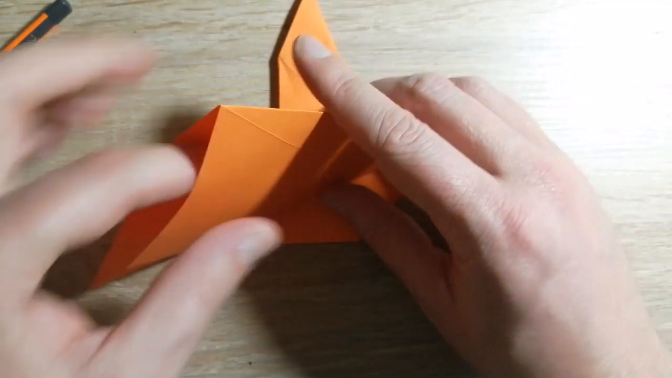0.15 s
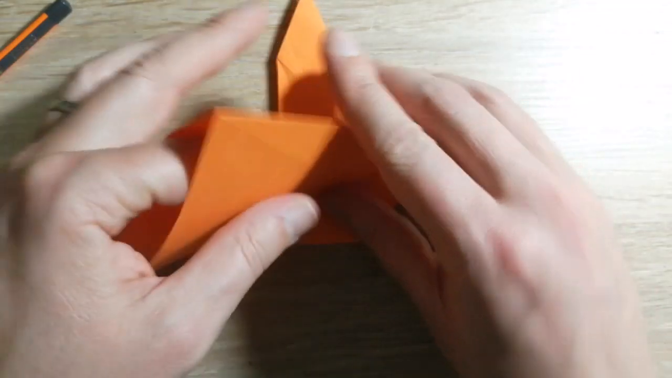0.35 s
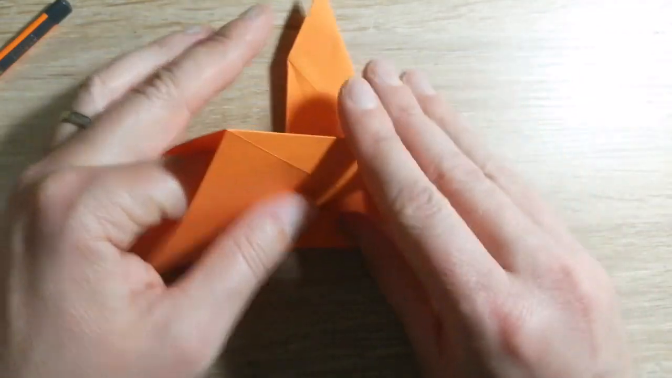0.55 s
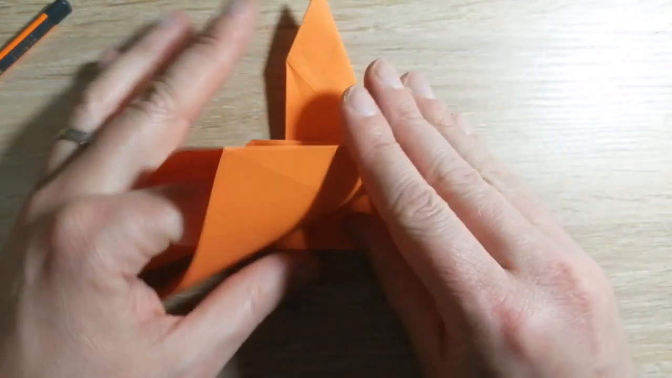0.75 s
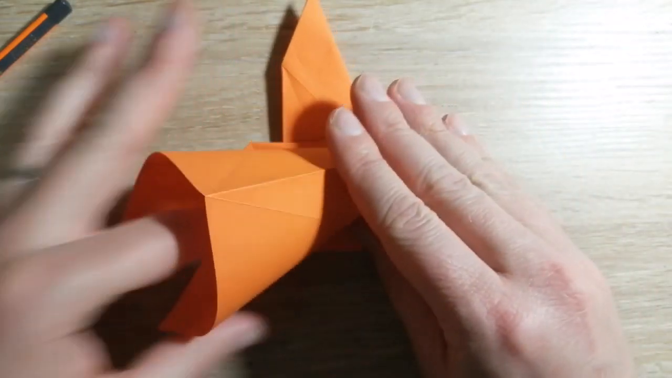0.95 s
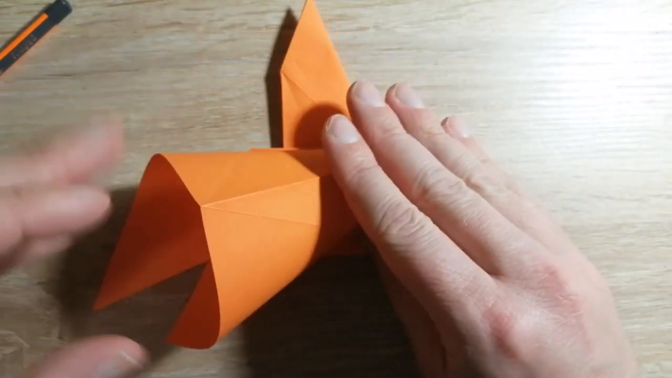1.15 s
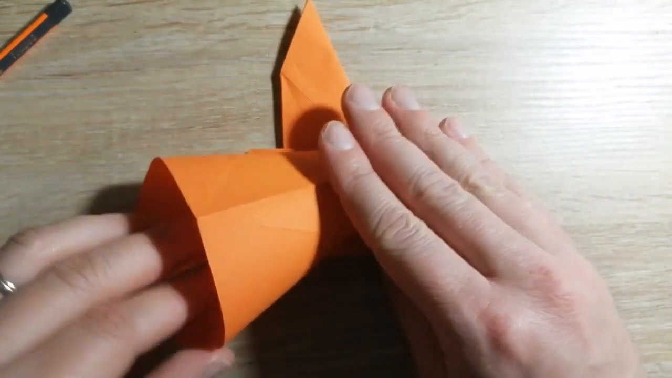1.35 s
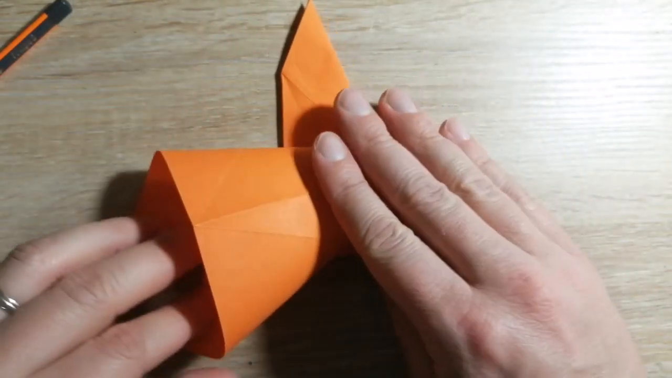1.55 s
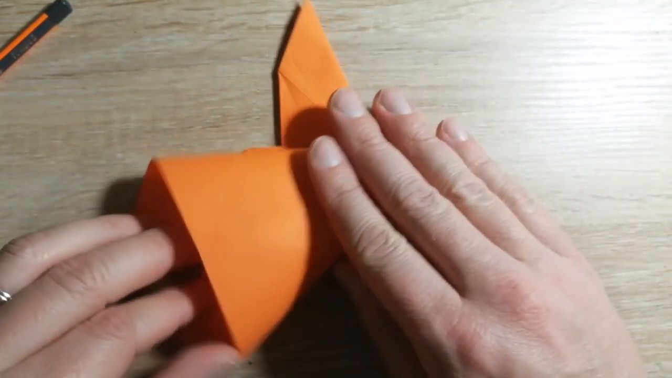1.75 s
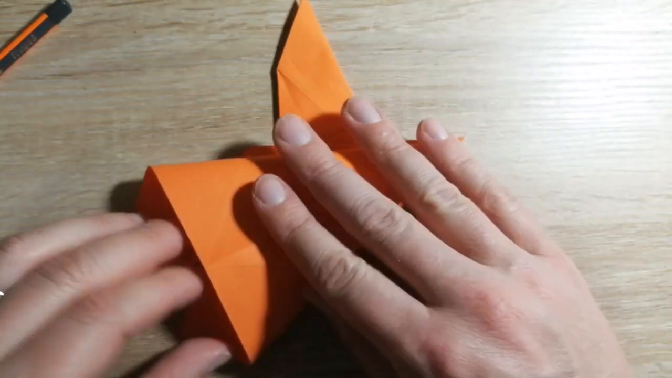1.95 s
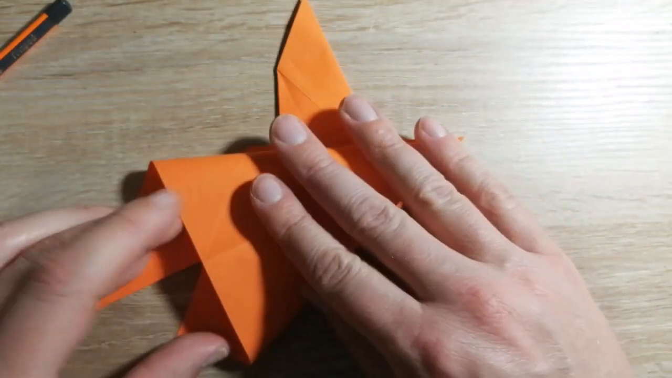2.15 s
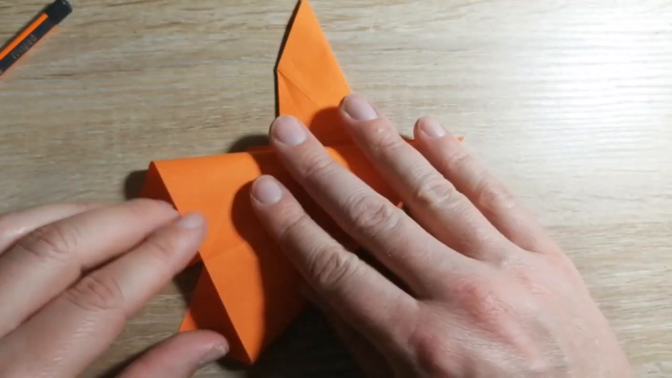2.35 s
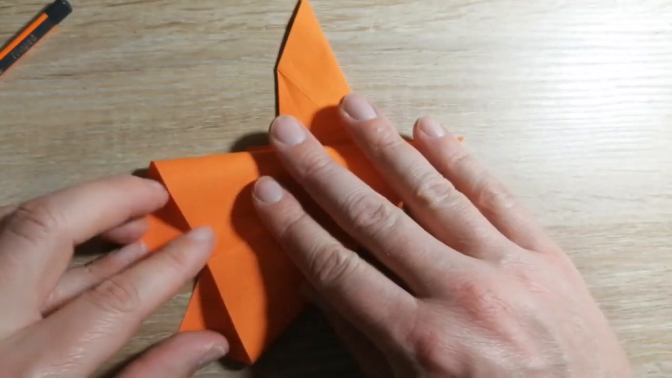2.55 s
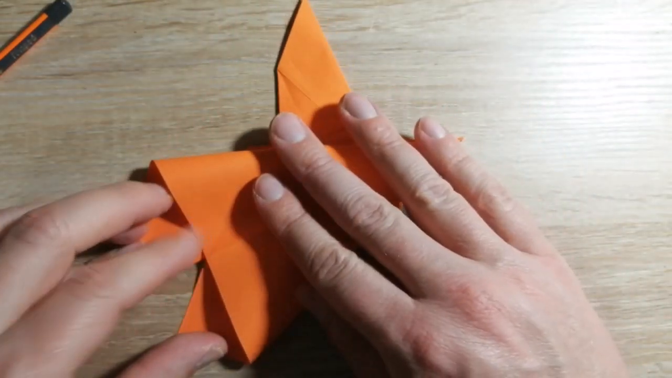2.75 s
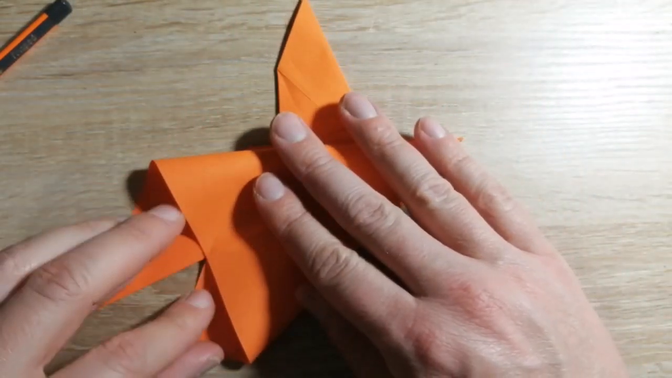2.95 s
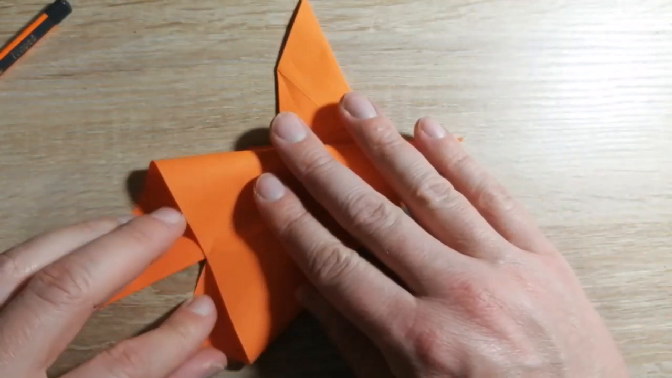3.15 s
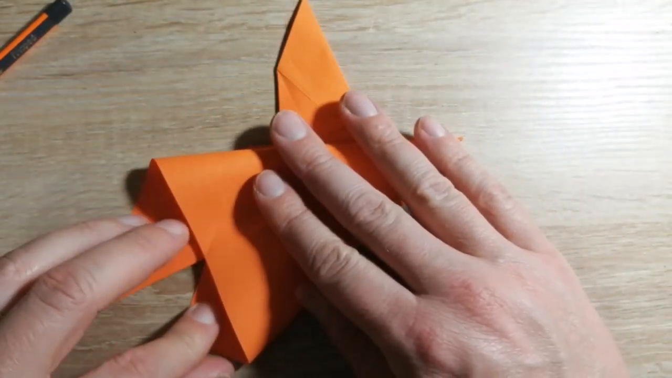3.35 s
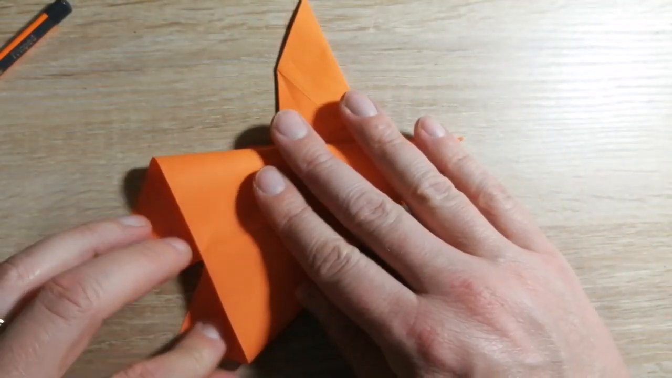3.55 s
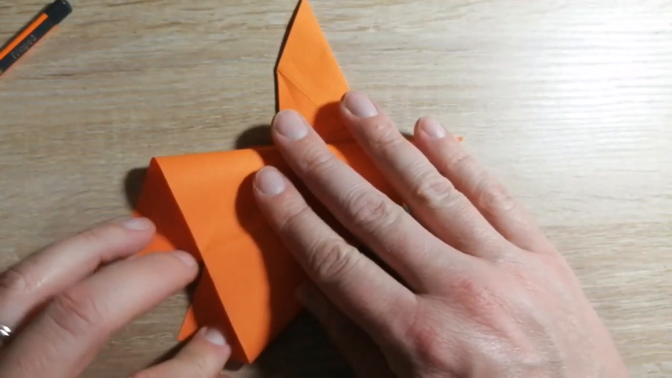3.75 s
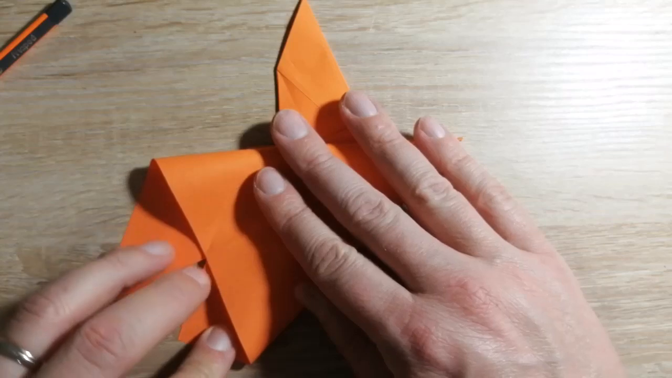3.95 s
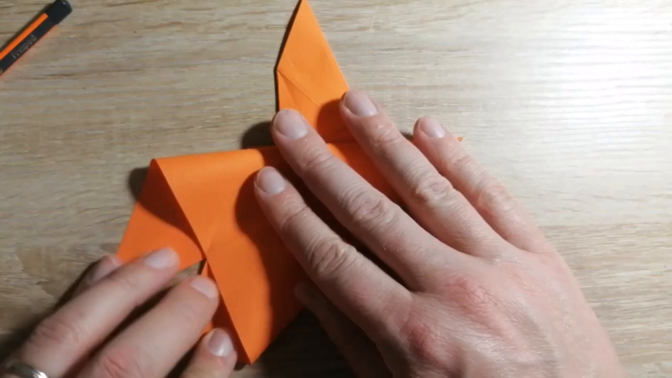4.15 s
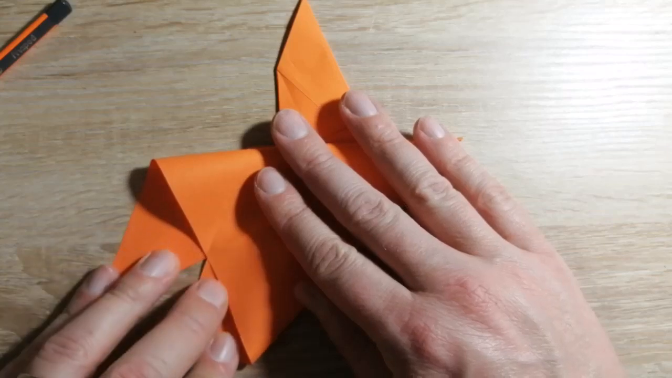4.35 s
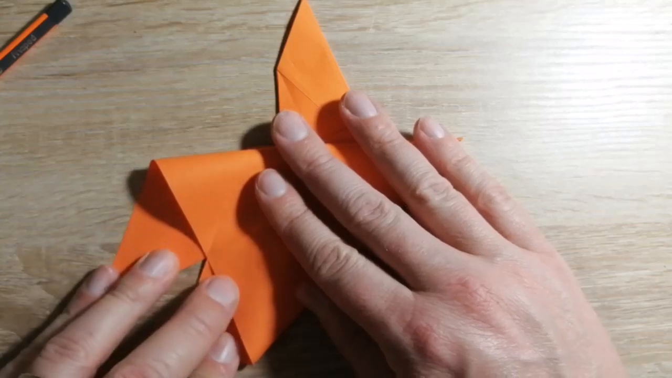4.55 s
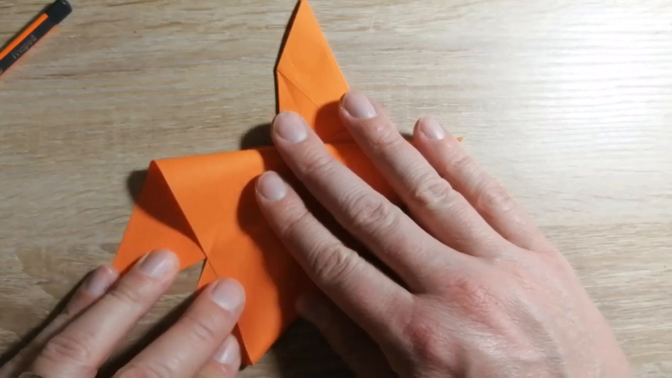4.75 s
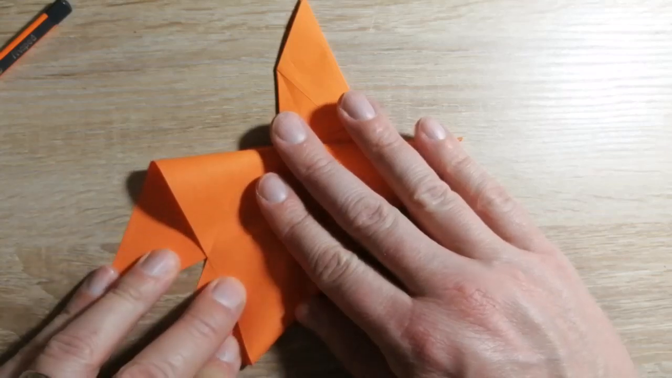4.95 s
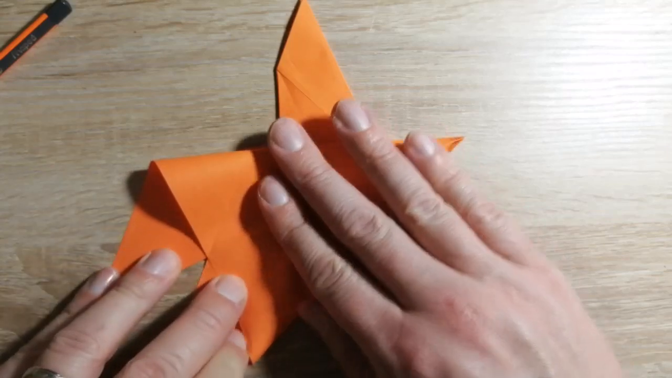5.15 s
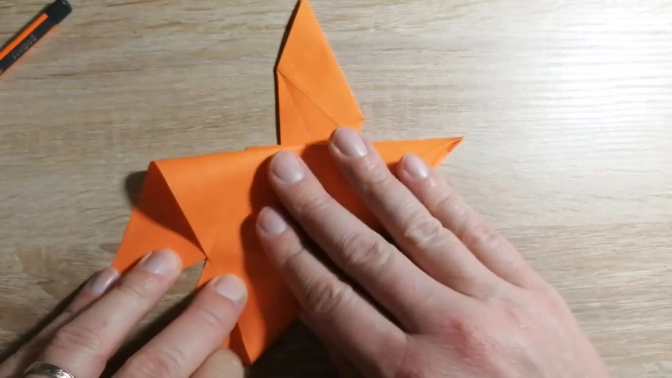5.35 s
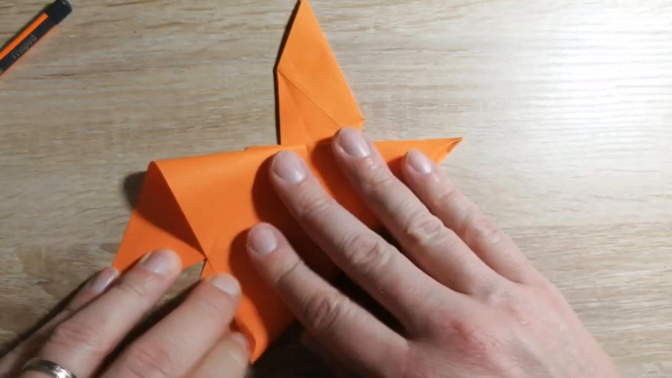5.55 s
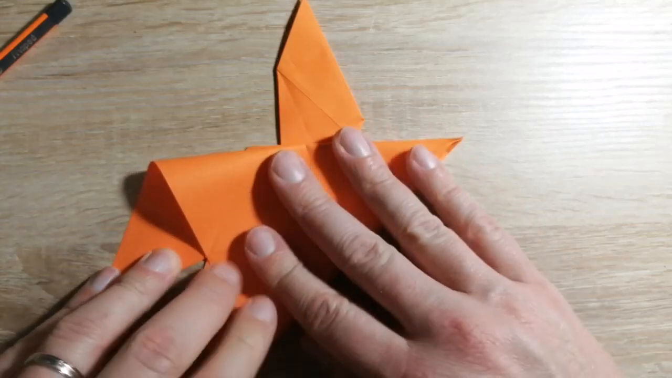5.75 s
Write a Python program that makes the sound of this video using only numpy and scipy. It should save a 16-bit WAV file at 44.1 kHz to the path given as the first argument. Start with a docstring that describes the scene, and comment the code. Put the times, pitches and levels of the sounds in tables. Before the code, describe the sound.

Hands handle folded paper on a table, close to the microphone in a quiet room with little echo. For the first two seconds, skin slides over the sheet in hissing swells while the paper flexes with a slightly hollow rustle. Creases snap crisply at about 0.4 seconds, in a cluster from 1.1 to 1.4, and most sharply near 1.9, with a few soft table bumps underneath. From 2 to 3.6 seconds it is much quieter: small, dull creaking ticks and light finger scuffs, the ticks slightly to the right. After a lull, fine crackles gather between 4.3 and 4.6 seconds. Fingertips then bump the table softly, with single snaps near 5 and 5.2, short smoothing swishes from 5.2 to 5.6, and a last snap just after. A faint low hum and room air continue throughout.

```python
"""Paper pocket, opened and pressed flat

Hands work folded paper on a table, close under a two-port microphone. Sliding skin hisses, the sheet
flexes and crackles, and the air pocket booms while it stands open. Creases snap, fingers scuff and bump
the table, small dull ticks creak. A quiet room hums behind it all."""
import sys
import numpy as np
from scipy import signal
from scipy.fft import rfft, irfft, next_fast_len
from scipy.io import wavfile
from scipy.ndimage import uniform_filter1d, map_coordinates

SR = 44100
rng = np.random.default_rng(int(sys.argv[2]) if len(sys.argv) > 2 else 0)


def store_wav(level_fs):
    """Save 16-bit WAV to argv[1]."""
    pcm = np.round(np.clip(np.atleast_2d(level_fs), -1, 1) * 32767)
    wavfile.write(sys.argv[1], SR, pcm.T.astype(np.int16))


N = 255896

# skin sliding on the sheet: (time [s], hiss level [dB], flex over hiss [dB])
SLIDE = [(0, -52, -1), (.14, -52, -6.5), (.22, -50, 2), (.28, -40.5, -12.5), (.41, -40.5, -10),
         (.55, -58, -2), (.63, -48, -5), (.74, -51, -4), (.84, -50.5, -0.5), (.99, -41.5, -4.5),
         (1.16, -51.5, 2), (1.25, -76, 1), (1.29, -63, -1), (1.34, -50, 3.5), (1.46, -55, 0.5),
         (1.6, -57, -6.5), (1.74, -67, 1), (1.8, -54, -1), (1.87, -42.5, -3.5), (2.1, -71, -5.5),
         (2.3, -83, 1), (2.62, -73, -1.5), (2.74, -61, -1), (2.86, -87, 5.5), (3.0, -64, 7),
         (3.1, -79, 3.5), (3.75, -82, -2.5), (3.95, -68, -5), (4.2, -81, -1.5), (4.38, -76, 0.5),
         (4.52, -62, 4), (4.62, -65.5, -4.5), (4.77, -65, -8), (5.1, -75.5, 0.5), (5.25, -53.5, -10),
         (5.39, -54, -8), (5.48, -78.5, -10.5), (5.58, -54.5, -10.5), (5.68, -82, -5), (5.8, -69.5, -7.5)]
# brightness of the slide, changing with angle and speed: (time [s], upper over lower treble [dB])
SLIDE_SHEEN = [(0, 4), (.42, -4), (1.0, 1.5), (1.29, -10.5), (1.65, 2.5), (1.9, 3), (2.5, -8), (3, -8.5),
               (3.9, -6), (4.5, -7), (4.9, -14), (5.3, -2), (5.8, -4)]
# the pocket booms when open and fades when pressed flat: (time [s], boom over flex [dB])
POCKET_BOOM = [(0, -6), (.17, -3), (.37, -4), (.62, -1.5), (.75, -19.5), (.92, -5), (1.1, -10.5),
               (1.3, -3.5), (1.5, -1), (1.6, -2.5), (1.85, -16.5), (3, -12.5), (4.25, -5.5), (4.5, -8),
               (5.3, -30), (5.6, -3.5)]
# the working hand travels from left to right: (time [s], left over right [dB])
HAND_PAN = [(0, 3), (1.15, 2), (1.4, 8.5), (1.85, 5), (1.95, -4.5), (3, 0.5), (4.3, -2), (4.6, -2),
            (5.3, -3.5), (5.8, 0)]
# creases giving way: (time [s], treble level [dB], mid level [dB], ring pitch [Hz])
CREASE_SNAPS = [(0.4353, -17.5, -22, 3190), (0.5299, -49, -35.5, 2570), (0.616, -33, -34.5, 860),
                (0.8977, -40, -29, 3140), (0.9994, -32, -42, 2170), (1.11, -17.5, -29, 1100),
                (1.2838, -20.5, -27, 2570), (1.294, -50, -38, 2940), (1.3036, -44, -32.5, 2980),
                (1.3271, -30, -26.5, 1940), (1.3432, -25, -34, 2450), (1.3928, -19, -27.5, 2340),
                (1.3967, -30.5, -37, 1830), (1.4111, -41, -35.5, 840), (1.8691, -17.5, -24.5, 1330),
                (1.881, -24, -52, 1550), (1.8839, -11.5, -25, 1490), (1.9119, -30, -36, 1440),
                (2.801, -42, -55, 1440), (3.5596, -47, -54.5, 1500), (4.301, -46, -48, 2780),
                (4.3257, -42, -52, 2940), (4.34, -37.5, -45.5, 2870), (4.4237, -42, -47.5, 2900),
                (4.4448, -32.5, -53, 2590), (4.463, -34, -48, 2330), (4.475, -36, -51, 1500),
                (4.4962, -38, -50, 1070), (4.505, -34, -52, 1520), (4.53, -37, -48, 2800),
                (4.5469, -32.5, -43, 2750), (4.567, -34, -49, 2850), (4.609, -29, -47, 1060),
                (4.6166, -35, -42, 2780), (4.9623, -37, -31, 2640), (5.1744, -44, -54, 1530),
                (5.1843, -39, -60, 1500), (5.205, -27, -47, 3470), (5.6439, -25.5, -50, 1760)]
# sudden finger slides: (time [s], treble level [dB], mid level [dB], rise [s], length [s])
FINGER_SCUFFS = [(0.157, -55, -45.5, 0.0008, 0.041), (0.303, -54, -42, 0.0009, 0.015),
                 (0.683, -40, -41.5, 0.0089, 0.017), (0.982, -33, -38.5, 0.0093, 0.014),
                 (1.093, -40, -38, 0.0061, 0.019), (1.283, -34.5, -36, 0.0037, 0.017),
                 (1.294, -40, -39, 0.0032, 0.033), (1.378, -43, -46, 0.00091, 0.0072),
                 (1.388, -44, -38.5, 0.0024, 0.03), (1.484, -37, -42.5, 0.0093, 0.018),
                 (1.679, -55, -54, 0.0052, 0.05), (1.772, -46, -38.5, 0.0048, 0.018),
                 (1.801, -47.5, -54.5, .002, 0.036), (2.349, -71.5, -69, .004, 0.049),
                 (2.431, -56, -57, 0.01, 0.051), (2.667, -52.5, -51, .018, .028),
                 (2.716, -62, -78, 0.017, 0.049), (2.787, -63, -64.5, 0.0066, 0.027),
                 (2.914, -52.5, -58.5, 0.0022, 0.028), (2.951, -51, -55, 0.0037, 0.046),
                 (2.996, -58, -62, .009, 0.043), (3.156, -69.5, -72, 0.0012, 0.028),
                 (3.212, -69.5, -65.5, .002, 0.091), (3.27, -57.5, -63, .008, 0.037),
                 (3.411, -66.5, -72, .001, 0.029), (3.602, -69, -71.5, 0.0027, .076),
                 (3.899, -59, -62, 0.0018, 0.095), (4.266, -80, -66, 0.0026, 0.064),
                 (4.959, -63, -59, 0.00093, 0.032), (5.471, -61, -70.5, 0.0063, 0.089),
                 (5.521, -51.5, -64, 0.0055, 0.029), (5.585, -54, -53, .004, 0.014),
                 (5.653, -64.5, -80, .001, 0.057)]
# tone of skin on paper, with the microphone's treble peak: (frequency [Hz], relative level [dB])
HISS_TONE = [(2240, -42.5), (3800, -22.5), (4400, -13.5), (5300, -4.5), (5900, -6.5), (6700, -2),
             (7400, -3.5), (8000, -10.5), (9000, -15.5), (10500, -19.5), (13000, -22.5), (15000, -20),
             (16000, -21)]
# tone of the bending sheet: (frequency [Hz], relative level [dB])
FLEX_TONE = [(530, -25), (900, -8), (1010, -7), (1450, -0.5), (1590, -5), (2210, -1), (2680, 0.5),
             (3160, 0.5), (4000, -9), (5200, -16), (8800, -120)]
# tone of the air pocket: (frequency [Hz], relative level [dB])
POCKET_TONE = [(88, -35), (150, -19), (264, -5), (325, -9.5), (419, 1), (725, -3.5), (950, 2.5),
               (1240, -11), (2090, -120)]
# dull creaks: (time [s], level [dB])
CREAK_TICKS = [(2.0713, -54), (2.1086, -56.5), (2.3251, -62), (2.355, -53.5), (2.4274, -55), (2.4466, -48),
               (2.4798, -56), (2.5078, -54), (2.5352, -52), (2.583, -51), (2.609, -62), (2.6214, -53),
               (2.635, -51), (2.662, -59), (2.6808, -52), (2.7187, -62), (2.7398, -52), (2.802, -58),
               (2.9198, -61.5), (2.9578, -59), (3.1555, -60), (3.2763, -51), (3.4114, -55), (3.4843, -55),
               (3.5603, -55), (3.6072, -52)]
# fingertips landing on the table: (time [s], level [dB])
TABLE_BUMPS = [(0.015, -53), (0.346, -50), (0.531, -51), (1.295, -47.5), (1.877, -64), (2.429, -60),
               (3.423, -75), (3.91, -71), (4.712, -50), (4.901, -52.5), (5.324, -51.5), (5.583, -50.5)]
# reverb time of the room: (frequency [Hz], 60 dB decay [s])
ROOM_DECAY = [(300, 0.11), (2000, 0.31), (10000, 0.055)]
# room air and microphone self noise: (frequency [Hz], relative level [dB])
AIR_TONE = [(35, -19), (60, 3.5), (164, -4), (274, -4), (346, -9.5), (651, -14), (1470, -18.5), (1910, -27),
            (3190, -25), (3850, -61), (6740, -19.5), (9130, -38), (14900, -26), (16000, -32)]
# a low wavering hum: (frequency [Hz], relative level [dB])
HUM_TONE = [(30, -25), (39, -6), (43.5, 3), (49, -5), (75, -35)]
# how alike the background is at both ports: (frequency [Hz], correlation [0-1])
BED_LIKENESS = [(40, 0.51), (300, 0.32), (800, 0.0067)]
# colour mismatch of the microphone's ports: (frequency [Hz], left over right [dB])
PORT_BALANCE = [(60, -2.5), (400, 0), (1300, -3.5), (2400, 0.5), (4400, -5), (9000, 3), (15000, 0.5)]

LEAD = 8  # samples by which the left port hears the paper first


def paper():
    """Every contact excites the paper's hiss, flex and pocket boom; the sheen tilts the hiss."""
    drive = rubbing() + crease_snaps() + finger_scuffs()
    hiss, flex, boom = map(resonate, drive, (HISS_TONE, FLEX_TONE, POCKET_TONE))
    tilt = amp(.5 * automation(SLIDE_SHEEN)[0])
    lower_hiss = signal.sosfiltfilt(signal.butter(3, 6500, fs=SR, output="sos"), hiss)
    return lower_hiss / tilt + (hiss - lower_hiss) * tilt + flex + boom


def rubbing():
    """Sliding friction drives hiss, flex and boom, grainiest in the bass and swelling by chance."""
    hiss_db, flex_db, boom_db = slide_levels()
    grain = fibre_slips(per_second=130, spread_db=5, t60=.003)
    fine_grain = fibre_slips(per_second=350, spread_db=3, t60=.005) ** .45
    pan = amp(np.outer([.5, -.5], automation(HAND_PAN)[0]))
    flutter = amp(.9 * wobble(30))
    hiss = amp(hiss_db) * patchy(fine_grain * port_noise(N, alike=.06), depth_db=2.5, size=256)
    flex_gain = amp(flex_db + 1.14 * wobble(12))
    flex = flex_gain * patchy(grain ** .4 * port_noise(N, alike=.24), depth_db=4, size=512)
    boom_gain = amp(boom_db + 1.5 * wobble(15))
    boom = boom_gain * patchy(grain ** 1.1 * port_noise(N, alike=.74), depth_db=3, size=1024)
    return pan * flutter * np.array([hiss, flex, boom])


def fibre_slips(per_second, spread_db, t60):
    """Crackle envelope: fibres let go in jolts of very uneven size over a steady rub."""
    onsets = rng.random(N) < per_second / SR
    sizes = amp(spread_db * np.minimum(rng.exponential(size=N), 4))
    return 1 + signal.lfilter([1], [1, -decay(1 / SR, t60)], onsets * sizes)


def crease_snaps():
    """A crease gives way: a short crack, longer for a big fold and in the bass, and a brief ring."""
    hiss, flex, boom = np.zeros((3, 2, N))
    t = np.arange(SR // 20) / SR
    for (s, treble_db, mid_db, hz), scatter in zip(CREASE_SNAPS, rng.standard_normal(len(CREASE_SNAPS))):
        pan_db = value_at(HAND_PAN, s) + 3 * scatter  # creases lie either side of the hand
        boom_db = mid_db + value_at(POCKET_BOOM, s) - 7
        boom_db += 3 * np.log2(2000 / hz)  # a big fold rings lower and booms more
        t60 = .0063 + .01 * amp(.5 * (mid_db + 22.5))
        crack = port_noise(len(t), alike=.49)
        crack /= np.sqrt(np.mean(crack[:, :SR // 1000] ** 2, axis=1, keepdims=True))
        crack *= 1 - np.exp(-t / .00055)  # the fold tips over in about half a ms
        bounce = .04 * decay(t, .074)  # table and hands throw the crack back
        roughness = np.cumsum(rng.normal(0, .1, len(t)))
        ring = decay(t, .018) * np.sin(2 * np.pi * hz * t + roughness)
        ring = np.array([ring, np.roll(ring, LEAD)])
        add(hiss, s, panned(treble_db, pan_db) * crack * (decay(t, .41 * t60) + bounce))
        add(flex, s, panned(mid_db, pan_db) * (crack * (decay(t, t60) + bounce) + amp(-7) * ring))
        add(boom, s, panned(boom_db, pan_db) * crack * decay(t, 1.7 * t60))
    return np.array([hiss, flex, boom])


def finger_scuffs():
    """A finger skids: friction swells, holds and stops rather sharply, leaving a faint drag."""
    hiss, flex, boom = np.zeros((3, 2, N))
    t = np.arange(SR // 5) / SR
    for s, treble_db, mid_db, rise, length in FINGER_SCUFFS:
        pan_db = value_at(HAND_PAN, s)
        attack = 1 - np.exp(-t / rise)
        release = np.exp(-(t / length) ** 3) + .2 * np.exp(-t / length)
        stroke = attack * release * port_noise(len(t), alike=.53)
        add(hiss, s, panned(treble_db, pan_db) * stroke)
        add(flex, s, panned(mid_db, pan_db) * stroke)
        add(boom, s, panned(mid_db + value_at(POCKET_BOOM, s) - 4.5, pan_db) * stroke)
    return np.array([hiss, flex, boom])


def creak_ticks():
    """Each slip rings a damped note and drags three weaker, detuned slips after it, right of centre."""
    track, t = np.zeros(N + SR), np.arange(SR // 20) / SR
    envelope = decay(t, .016) * (1 - np.exp(-t / .0015))
    for (s, db), followers in zip(CREAK_TICKS, rng.random((len(CREAK_TICKS), 3, 3))):
        first_slip = (0, rng.uniform(.2, .97), -.6)
        for lag, detune, weakness in [first_slip, *followers]:
            hz = 1282 * (.796 + .44 * detune)
            waver = np.cumsum(rng.normal(0, .08, len(t)))
            note = envelope * np.sin(2 * np.pi * hz * t + waver)
            track[round((s + .045 * lag) * SR):][:len(t)] += amp(db - 10 * weakness) * note
    return np.array([track[LEAD:N + LEAD], track[:N]]) * amp([[-3], [2.5]])


def table_bumps():
    """A soft push sets two low modes of the table top swinging for a few cycles."""
    track, t = np.zeros((2, N)), np.arange(SR // 5) / SR
    envelope = decay(t, .11) * (1 - np.exp(-t / .02))
    for s, db in TABLE_BUMPS:
        modes_hz = np.array([105, 210]) * (.814 + .278 * rng.random(2))
        swing = sum(np.sin(2 * np.pi * hz * t) for hz in modes_hz)
        add(track, s, panned(db, pan_db=-1.7) * swing * envelope)
    return track


def room_reverb(x):
    """The walls answer with a short tail that lingers in the mids and dies fastest in the treble."""
    hz, t, spectra = signal.stft(rng.standard_normal((2, SR // 2)), SR, nperseg=256)
    tail = signal.istft(spectra * decay(t, along(ROOM_DECAY, hz)[:, None]), SR, nperseg=256)[1]
    predelayed = np.pad(x.mean(0), (300, 0))[None]
    return signal.fftconvolve(predelayed, tail / np.linalg.norm(tail[0]), axes=1)[:, :N]


def background():
    """Room air and hum, plus a table rumble that follows the level of the pocket's boom."""
    _, _, boom_db = slide_levels()
    rumble_gain = amp(-11) * uniform_filter1d(amp(boom_db), size=4000)
    rumble = rumble_gain * noise_bed([(30, -2), (70, -9.5), (140, 1), (250, -42)])
    room_tone = amp(-71) * noise_bed(AIR_TONE) + amp(-72) * noise_bed(HUM_TONE)
    return room_tone * panned(0, pan_db=-3.2) + rumble


def noise_bed(tone):
    """Steady stereo noise of rms 1, centred in the bass and wide above."""
    size = next_fast_len(N)
    hz = np.fft.rfftfreq(size, 1 / SR)
    width = np.arccos(along(BED_LIKENESS, hz)) / 2
    spectra = rfft(rng.standard_normal((2, size))) * amp(along(tone, hz))
    mid, side = irfft(spectra * [np.cos(width), np.sin(width)], size)[:, :N]
    return unit_rms(np.array([mid + side, mid - side]))


def slide_levels():
    """Hiss, flex and boom in dB: the slide leads, the sheet and the pocket follow."""
    hiss_db, flex_over_db = automation(SLIDE)
    flex_db = hiss_db + flex_over_db
    return hiss_db, flex_db, flex_db + automation(POCKET_BOOM)[0]


def resonate(x, tone, size=4096):
    """Colours x with a minimum-phase filter of energy 1, so the ringing follows the hit."""
    gain = np.maximum(amp(along(tone, np.fft.rfftfreq(size, 1 / SR))), 1e-4)
    cepstrum = irfft(np.log(gain), size)
    cepstrum[1:size // 2] *= 2
    cepstrum[size // 2 + 1:] = 0
    pulse = irfft(np.exp(rfft(cepstrum)), size)
    return signal.fftconvolve(x, pulse[None] / np.linalg.norm(pulse), axes=1)[:, :N]


def port_noise(length, alike):
    """Noise for both ports: a shared part that reaches the left first, and a part of their own."""
    source = rng.standard_normal(length + LEAD)
    shared = np.array([source[LEAD:], source[:length]])
    return np.sqrt(alike) * shared + np.sqrt(1 - alike) * rng.standard_normal((2, length))


def patchy(x, depth_db, size):
    """Random gain in patches of time and pitch, as the sheet's shape and the contact change."""
    spectra = signal.stft(x, nperseg=size)[2]
    patches = uniform_filter1d(rng.standard_normal(spectra.shape[1:]), size=3, axis=0)
    patches = unit_rms(uniform_filter1d(patches, size=8, axis=1))
    return unit_rms(signal.istft(spectra * amp(depth_db * patches), nperseg=size)[1][:, :N])


def wobble(rate):
    """A smooth random curve, rate knots a second."""
    return map_coordinates(rng.standard_normal(int(N * rate / SR) + 4), [np.arange(N) * rate / SR])


def automation(rows):
    """One value per sample for each column after the time."""
    s, *columns = np.transpose(rows)
    return [np.interp(np.arange(N) / SR, s, column) for column in columns]


def value_at(rows, s):
    """Reads a (time, value) curve at s seconds."""
    return np.interp(s, *np.transpose(rows))


def along(points, hz):
    """Reads a (frequency, value) curve on a log axis."""
    knots_hz, values = np.transpose(points)
    return np.interp(np.log(hz + 1), np.log(knots_hz + 1), values)


def amp(db):
    """Gain of a level in dB."""
    return 10 ** (np.asarray(db) / 20)


def decay(t, t60):
    """Falls 60 dB every t60 seconds."""
    return amp(-60 * t / t60)


def unit_rms(x):
    """Scaled to rms 1."""
    return x / np.sqrt(np.mean(x ** 2) + 1e-20)


def panned(db, pan_db):
    """Gains of both ports; positive pan leans left."""
    return amp([[db + pan_db / 2], [db - pan_db / 2]])


def add(track, s, sound):
    """Mixes a stereo sound in at s seconds."""
    i = round(s * SR)
    track[:, i:i + sound.shape[1]] += sound[:, :N - i]


def scene():
    """Paper and ticks up close with a little reverb, over table bumps and room tone."""
    close = paper() + creak_ticks()
    return close + amp(-11.5) * room_reverb(close) + table_bumps() + background()


def record(dry):
    """The microphone colours each port its own way and cuts off the very top."""
    size = next_fast_len(N + SR // 4)
    hz = np.fft.rfftfreq(size, 1 / SR)
    port_gains = amp(np.outer([.5, -.5], along(PORT_BALANCE, hz)))
    return irfft(rfft(dry, size) * port_gains * (hz < 15750), size)[:, :N]


dry = scene()
out = record(dry)
store_wav(out)
```